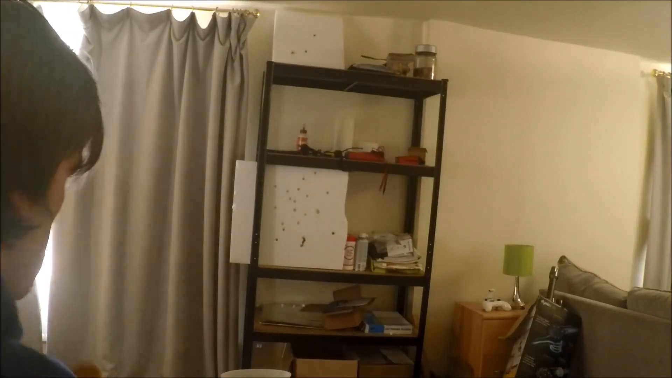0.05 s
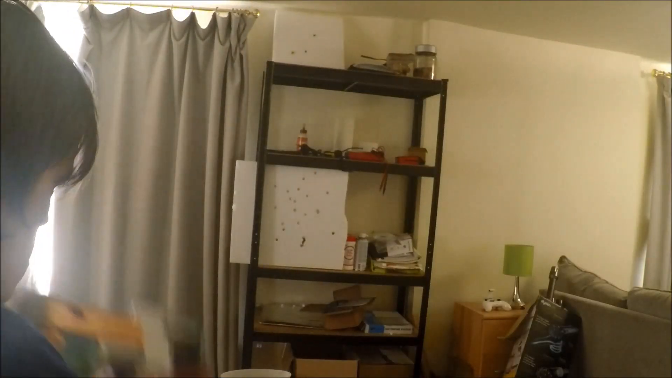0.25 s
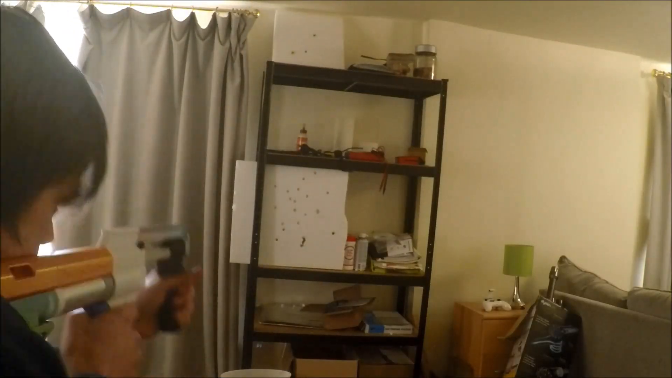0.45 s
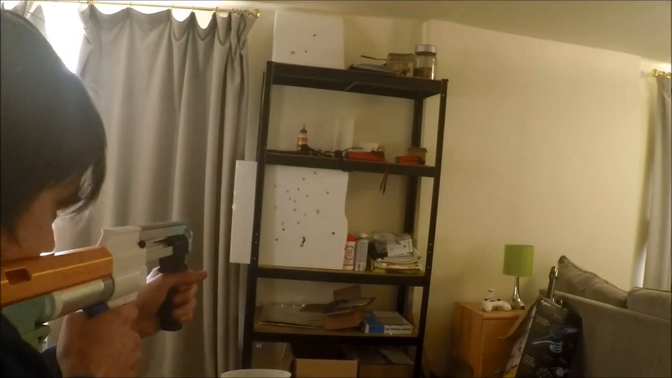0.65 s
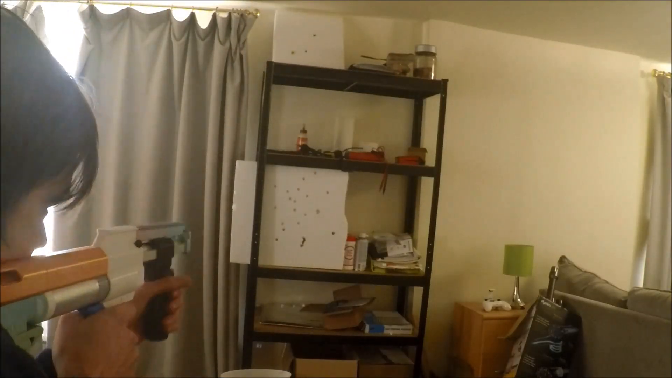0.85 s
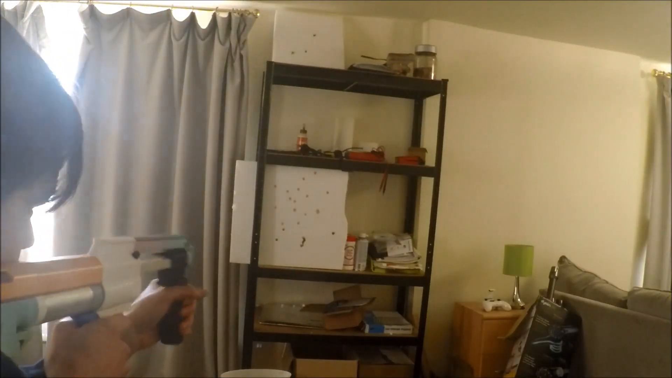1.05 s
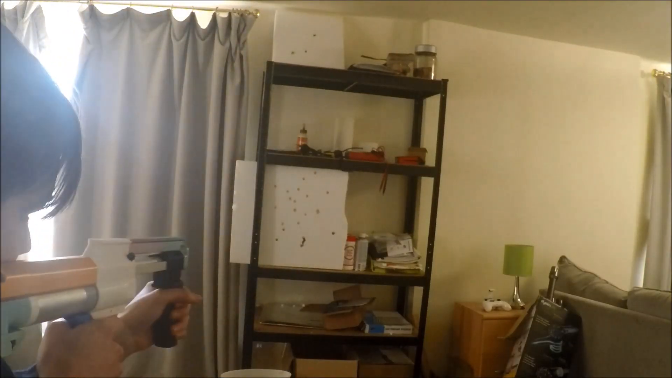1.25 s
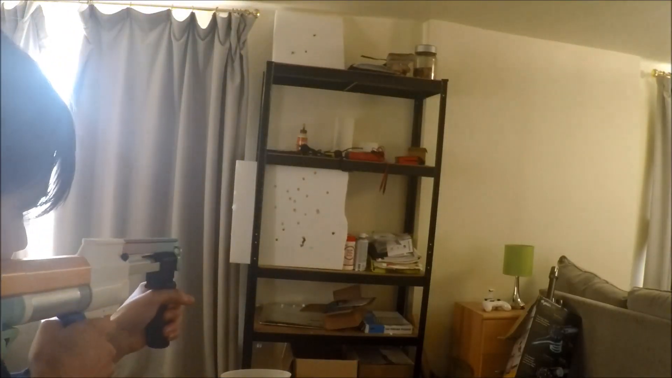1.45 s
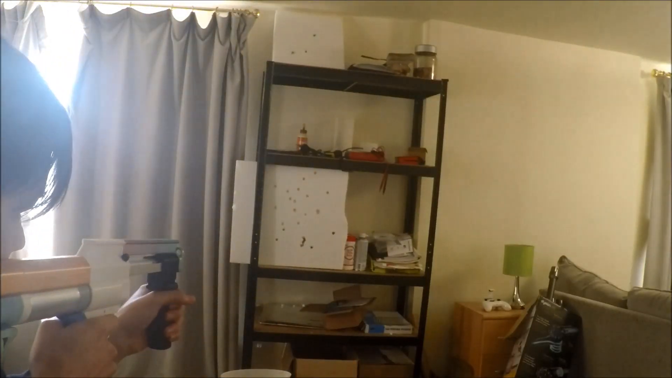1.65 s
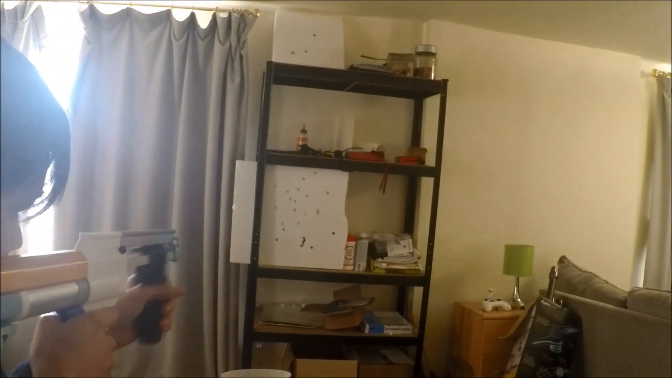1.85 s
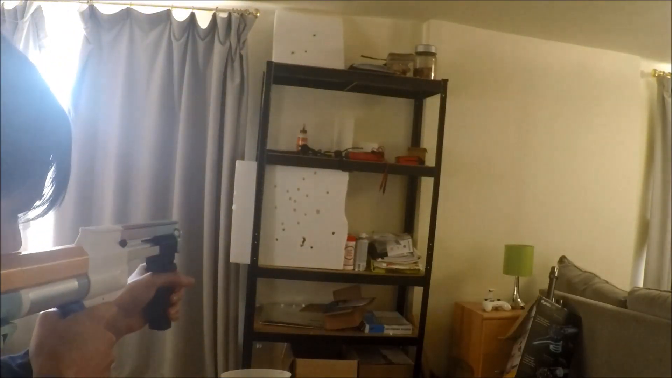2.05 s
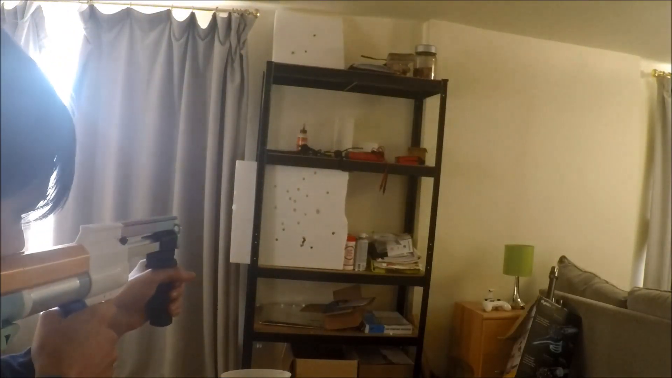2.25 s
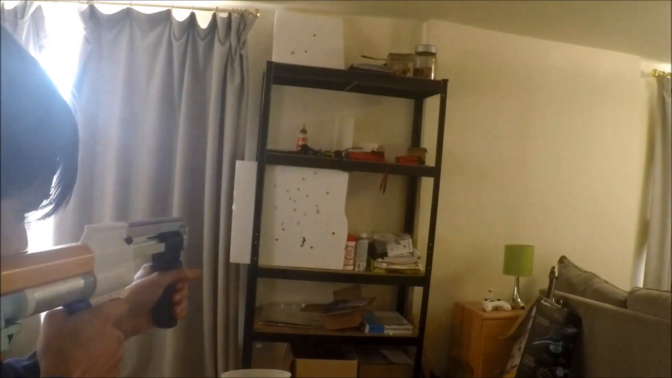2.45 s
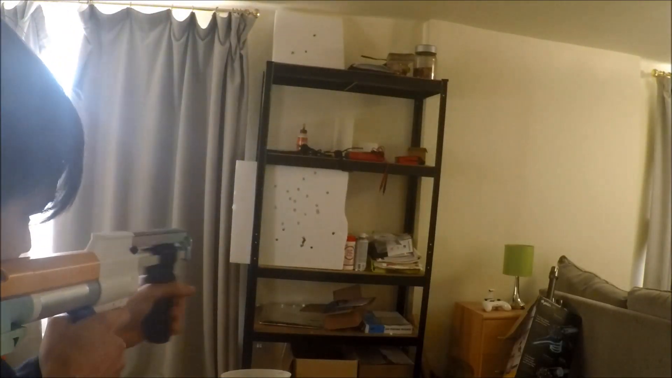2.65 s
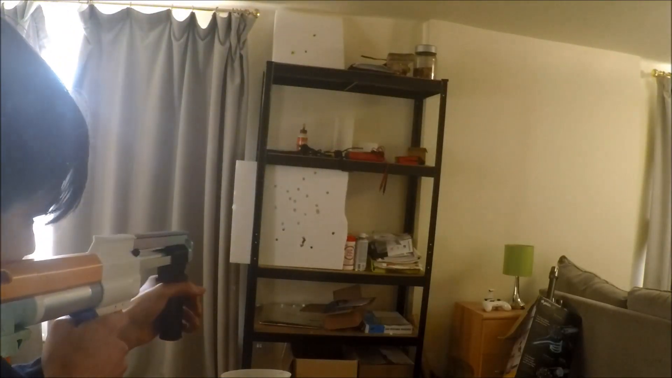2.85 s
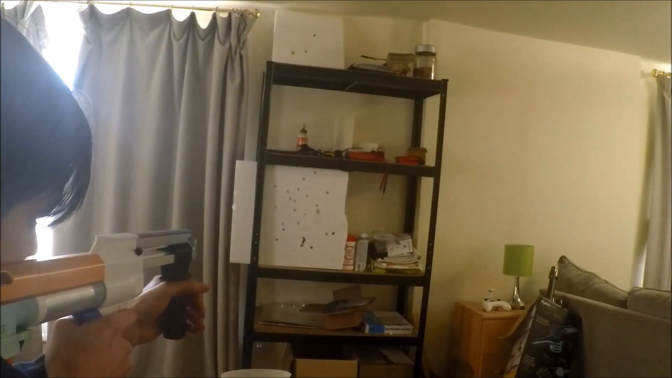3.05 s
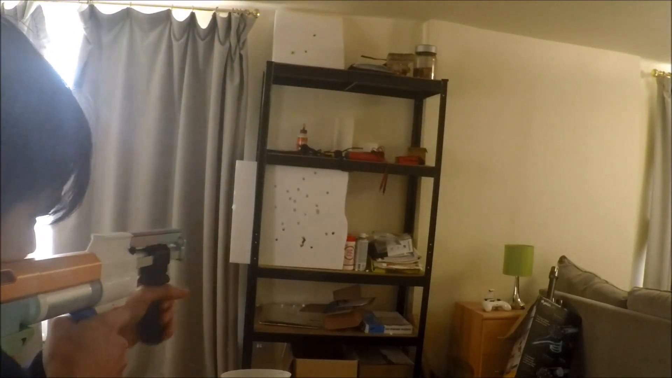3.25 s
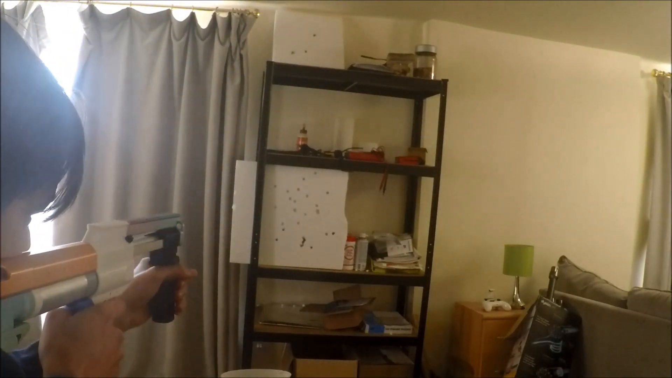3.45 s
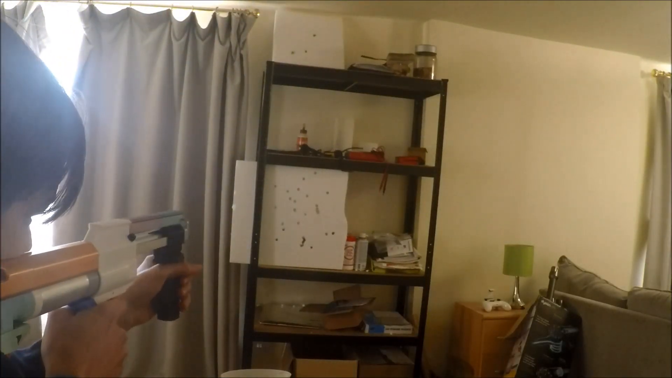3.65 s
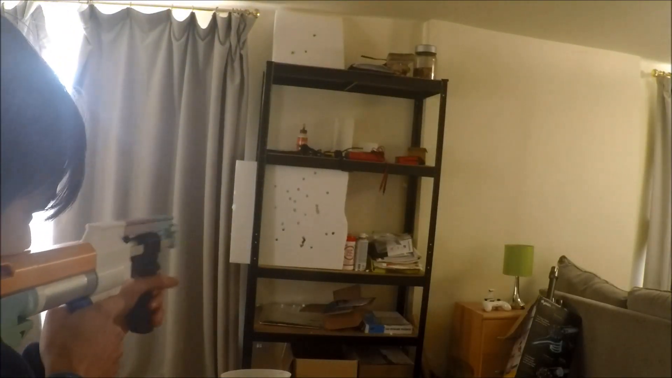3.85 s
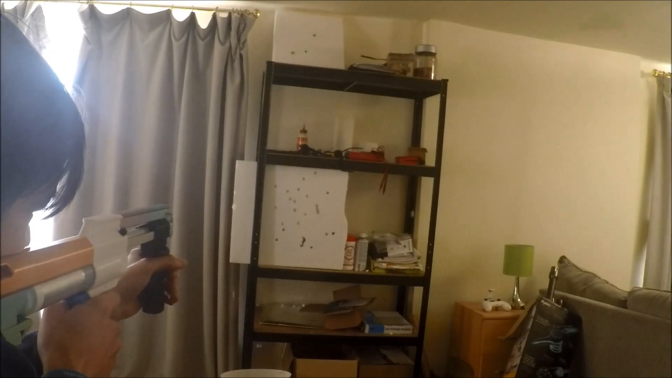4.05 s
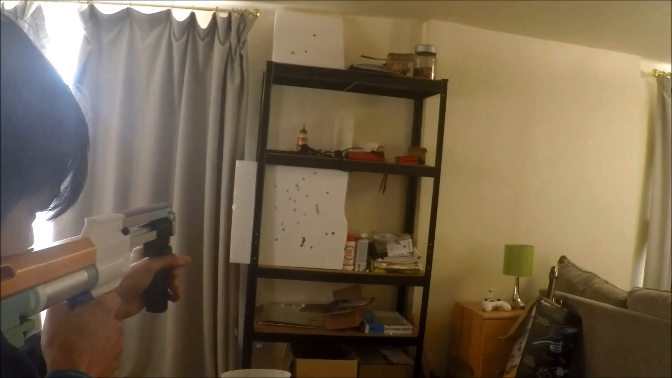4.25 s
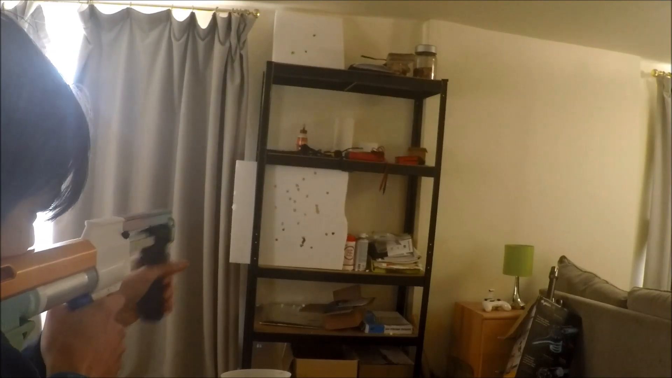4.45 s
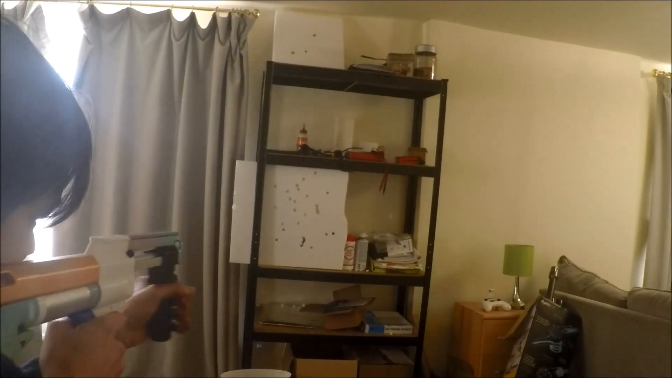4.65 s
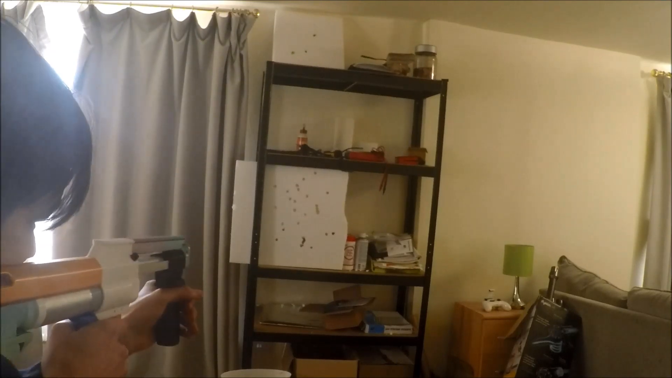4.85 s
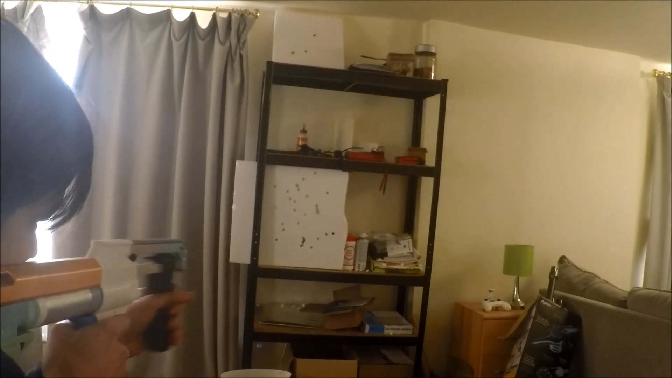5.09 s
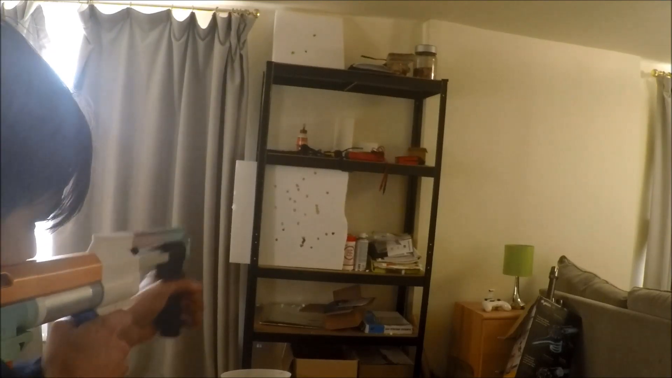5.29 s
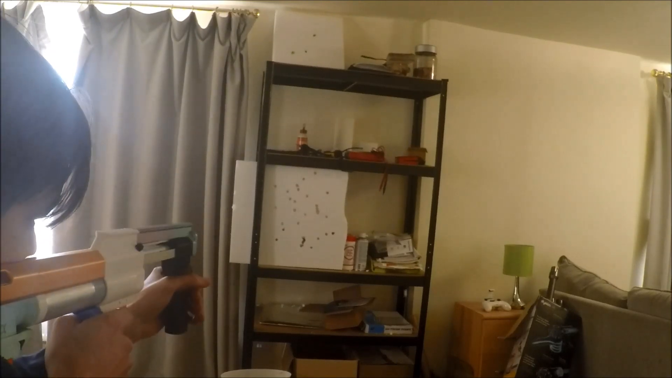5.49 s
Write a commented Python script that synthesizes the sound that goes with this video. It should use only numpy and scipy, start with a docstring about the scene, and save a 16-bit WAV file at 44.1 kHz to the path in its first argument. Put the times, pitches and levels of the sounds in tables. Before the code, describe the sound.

A plastic pump-action toy blaster works close to the microphone in a furnished living room, over faint hiss and low rumble. At about 0.9 seconds its grip slides back with a brief rasp and a click, then clacks forward at 1.1. The first shot comes at 1.5 seconds: a loud, rattling plastic snap with a low thump and a faint ring from the spring. More shots follow at about 2.3, 3.0, 3.6, 4.2, 4.9 and 5.5 seconds, each preceded by the same quieter back-and-forward pair of clacks and small ticks. A split second after each of the first six shots, a foam dart slaps a board across the room, with a brief ring and low boom. Soft bumps of falling darts and handling come in between. The room's reverberation is short, and the sound ends right after the seventh shot.

```python
"""A pump-action toy blaster is primed and fired seven times in a furnished living room.
In each shot a spring drives a plunger rattling down the plastic shell, and the recoil excites the modes
of shell and coil. Some 50 ms later the foam dart slaps a board, which rings over a low boom.
Before each shot the grip slides back to a catch, then forward to a stop, with friction and impacts.
Spent darts drop softly, and the room adds a short reverberation over faint hiss and rumble."""
import sys
import numpy as np
from scipy import signal
from scipy.fft import rfft, irfft
from scipy.io import wavfile
from scipy.ndimage import uniform_filter1d, minimum_filter1d

SR = 44100
rng = np.random.default_rng(int(sys.argv[2]) if len(sys.argv) > 2 else 0)


def transcribe(signal):
    """Save signal, clipped to [-1, 1], as a 16-bit WAV file at the path in sys.argv[1]."""
    frames = np.atleast_2d(signal).T
    limited = np.clip(frames, -1, 1)
    pcm = np.round(limited * 32767).astype(np.int16)
    wavfile.write(sys.argv[1], SR, pcm)


N = 243476
TIME = np.arange(N) / SR
PULL_S = 0.067   # duration of every backward stroke

# Trigger releases: t/s, rattle level/dB, thump level/dB (all table levels are relative)
SHOTS = [(1.4712, 2.5, 2), (2.3011, 0.5, 3), (2.9697, 0.5, 0), (3.6185, 1, -0.5), (4.2481, 1, 1),
         (4.9295, 0.5, 1.5), (5.498, 0.5, -1)]
# The grip reaches the rear catch: t/s, crack level/dB, latch level/dB, pull friction level/dB
CATCHES = [(0.8908, -15.5, -23, -41), (1.8121, -20, -24, -42), (2.596, -27, -28.5, -45),
           (3.245, -27.5, -28, -45.5), (3.8652, -22, -24.5, -42.5), (4.574, -23.5, -22.5, -43),
           (5.1968, -26.5, -27.5, -46)]
# The grip reaches the front stop: t/s, clack level/dB, push friction level/dB
STOPS = [(1.0883, -17.5, -42), (1.959, -17, -41.5), (2.7688, -22.5, -46), (3.379, -16, -41),
         (4.0284, -23, -42.5), (4.7135, -16, -41), (5.3412, -22.5, -42)]
# Spectrum of plastic rubbing on plastic: f/Hz, level/dB
FRICTION = [(150, -17.5), (500, -6.5), (1000, -0.5), (2200, 1), (3000, -2), (4200, -2.5), (6500, -9.5),
            (10000, -18.5), (16000, -30)]
# Spectrum of a dull impact: f/Hz, level/dB
BUMP = [(60, -20), (180, 0.5), (380, -3.5), (600, -7.5), (1200, -27), (5000, -79)]


def from_db(db):
    """Amplitude ratio of a level in decibels."""
    return 10 ** (np.asarray(db) / 20)


def at_hz(points, hz):
    """Interpolation on a logarithmic frequency axis."""
    knots, values = np.transpose(points)
    return np.interp(np.log(np.maximum(hz, 1)), np.log(knots), values)


def unit_energy(x):
    """A response of unit energy passes white noise at unchanged power."""
    return x / np.sqrt(np.sum(x ** 2) + 1e-20)


def through(x, response):
    """Convolution with an impulse response, cut to the scene's length."""
    return signal.fftconvolve(x, response)[:N]


def colour(x, spectrum, size=8192):
    """Minimum-phase filter of unit power gain: folding the cepstrum makes it causal."""
    hz = np.arange(size // 2 + 1) * SR / size
    cepstrum = irfft(np.log(from_db(at_hz(spectrum, hz))))
    cepstrum[1:size // 2] *= 2
    cepstrum[size // 2 + 1:] = 0
    return through(x, unit_energy(irfft(np.exp(rfft(cepstrum)))))


def clicks(times, db):
    """Impulsive excitation: one impulse per event."""
    out = np.zeros(N)
    out[np.clip(np.round(np.asarray(times) * SR).astype(int), 0, N - 1)] = from_db(db)
    return out


def fade(t, t60):
    """Exponential decay, by 60 dB in t60 seconds."""
    return np.exp(-np.log(1000) * t / t60)


def ring(force, hz, t60):
    """Damped oscillator: a unit impulse starts a decaying sine of height 1."""
    r, w = fade(1 / SR, t60), 2 * np.pi * hz / SR
    return signal.lfilter([0, np.sin(w)], [1, -2 * r * np.cos(w), r * r], force + 1e-18)


def grit(spread_db, grain_s):
    """Random amplitude modulation: noise of rms 1 whose level varies from grain to grain."""
    knots = np.arange(0, N / SR, grain_s)
    white = rng.standard_normal(N)
    strength = np.clip(rng.standard_normal(N)[:len(knots)], -2, 2)
    x = white * from_db(spread_db * np.interp(TIME, knots, strength))
    return x / np.std(x)


def knocks(rows, spectrum, gain_db, t60, chatter_s, attack_s):
    """Impact noise: at each row (t/s, level/dB) loose parts chatter briefly, then damping takes over."""
    times, db, *_ = np.transpose(rows)
    t = TIME[:SR // 2]
    envelope = np.minimum(t / attack_s, 1) * fade(np.maximum(t - chatter_s, 0), t60)
    return colour(grit(2.56, 0.00091) * through(clicks(times, db + gain_db), envelope), spectrum)


def background(hiss_db=-56, rumble_db=-61.5):
    """Ambient noise floor: a steady faint hiss and an uneven low rumble."""
    # Spectra of hiss and rumble: f/Hz, level/dB
    hiss_spectrum = [(20, 4), (56, 2), (123, -18), (200, -15.5), (400, -25.5), (1000, -29.5), (3500, -33.5),
                     (8000, -40), (14000, -46), (16000, -57)]
    rumble_spectrum = [(15, -10.5), (45, 1.5), (110, -17.5), (220, -24), (600, -51), (3000, -87)]
    rumble = colour(grit(4, 0.025), rumble_spectrum)
    hiss = colour(rng.standard_normal(N), hiss_spectrum)
    return from_db(hiss_db) * hiss + from_db(rumble_db) * rumble


def soft_bumps():
    """Soft contacts last long, so their energy lies at low frequencies."""
    # Falling darts and handling: t/s, level/dB
    bumps = [(.383, -60.5), (.826, -53.5), (.893, -53), (2.483, -42), (2.812, -48.5), (3.21, -41),
             (4.53, -46), (4.66, -44), (5.253, -39.5)]
    return knocks(bumps, BUMP, gain_db=-0.5, t60=0.15, chatter_s=0.025, attack_s=0.0088)


def small_contacts():
    """Backlash: parts tick as the grip unlocks, rides a ridge and feeds a dart, or the trigger moves."""
    # The grip knocks in its play: t/s, level/dB
    ticks = [(.776, -57), (.989, -33), (1.714, -51), (3.179, -39.5), (3.934, -36.5), (4.479, -44.5),
             (4.634, -34.5)]
    unlock = [(t - PULL_S, pull_db - 4.5) for t, *_, pull_db in CATCHES]
    ridge = [(t - 0.032, pull_db) for t, *_, pull_db in CATCHES]
    feed = [(t - 0.052, push_db + 3.5) for t, _, push_db in STOPS]
    trigger = [(t - 0.041, -63.5) for t, *_ in SHOTS]
    contacts = ticks + unlock + ridge + feed + trigger
    return knocks(contacts, FRICTION, gain_db=-2, t60=0.028, chatter_s=0.004, attack_s=0.0015)


def travel(start, end, end_db, rise_db):
    """Friction grows with load and speed: the envelope of one stroke, rising linearly in level."""
    progress = (TIME - start) / (end - start)
    return from_db(end_db - rise_db * (1 - np.clip(progress, 0, 1))) * (progress >= 0) * (progress < 1)


def slide(gain_db=-0.5, slip_db=4.5, slips_per_s=45):
    """Stick-slip friction: the grip rasps and ticks as it is pulled back, slackens and is pushed home."""
    envelope = 0
    for (rear, _, _, pull_db), (front, _, push_db) in zip(CATCHES, STOPS):
        pull = travel(rear - PULL_S, rear, pull_db, rise_db=8)   # the spring is squeezed
        slacken = from_db(pull_db + 2.5) * fade(np.abs(TIME - rear), t60=0.25) * (TIME >= rear)
        push = travel(rear, front, push_db, rise_db=14.5)   # the grip gathers speed
        envelope = envelope + pull + np.hypot(slacken, push)
    slips = signal.lfilter([1], [1, -fade(1 / SR, t60=0.018)], rng.random(N) < slips_per_s / SR)
    rasp = envelope * (1 + from_db(slip_db) * slips) * grit(2, 0.002)
    return from_db(gain_db) * colour(rasp, FRICTION)


def end_clacks():
    """Hard contacts are brief, hence broadband: the grip strikes the rear catch, then the front stop."""
    # Spectra of the two impacts: f/Hz, level/dB
    catch_spectrum = [(150, -21), (450, -14), (1000, -5.5), (1400, -7.5), (1900, 5), (2450, -1.5),
                      (2900, -3.5), (4500, -3.5), (6000, -11), (9000, -18), (16000, -32)]
    stop_spectrum = [(150, -15), (550, -13.5), (950, 0), (1300, -5.5), (1750, 2), (2500, -5), (4100, -1),
                     (6000, -8.5), (9000, -14), (16000, -35)]
    rear = knocks(CATCHES, catch_spectrum, gain_db=-6, t60=0.011, chatter_s=0.0077, attack_s=0.000465)
    front = knocks(STOPS, stop_spectrum, gain_db=-9.5, t60=0.049, chatter_s=0.0063, attack_s=0.0026)
    return rear + front


def latch(gain_db=-1.5, chatter_s=0.0055):
    """Free vibration of a stiff tongue: the catch drops into its notch, chatters and rings briefly."""
    # Modes of the tongue: f/Hz, level/dB, T60/s
    modes = [(1900, -36, 0.027), (2275, 2.5, 0.0212), (2476, -1, 0.054), (2600, -0.5, 0.024)]
    times, _, ring_db, _ = np.transpose(CATCHES)
    drops = clicks(times, ring_db + gain_db)
    chatter = np.interp(TIME[:SR // 20], [0, chatter_s, 2 * chatter_s], [1, 1, 0])
    rebounds = through(drops, unit_energy(chatter))
    return sum(from_db(db) * ring(drops + rebounds * rng.standard_normal(N), hz, t60)
               for hz, db, t60 in modes)


def shell_thuds():
    """Structure-borne sound: either end of the grip's travel thuds through the shell."""
    ends = [row[:2] for row in CATCHES + STOPS]
    return knocks(ends, BUMP, gain_db=-30.5, t60=0.1, chatter_s=0.0039, attack_s=0.0023)


def spring(shot_db=-46, catch_db=-55, stop_db=-64, t60=0.55):
    """High modal density: jarred by catch, stop and release, the coil's wire rings on as noise."""
    # Envelope of the close wire modes: f/Hz, level/dB
    wire_spectrum = [(700, -11.5), (1400, -4.5), (1850, 2), (2400, -9), (3200, -1), (4000, 9), (4700, -10),
                     (6000, -19.5), (12000, -42)]
    causes = [(SHOTS, shot_db), (CATCHES, catch_db), (STOPS, stop_db)]
    times, levels = np.transpose([(row[0], db) for rows, db in causes for row in rows])
    envelope = through(clicks(times, levels), fade(TIME[:SR], t60))
    return colour(grit(0.86, 0.0041) * envelope, wire_spectrum)


def plunger(rattle_db=-18, slam_db=3.5, alike=0.402, creep_s=0.0059, settle_t60=0.054):
    """Friction and repeated impact: the plunger scrapes down its tube, slams home and rebounds."""
    # The slam and its rebounds: t/s after release, level/dB
    impacts = [(0.0086, 5), (0.012, -11), (0.0192, 0.5)]
    # Spectrum of the rattling shell: f/Hz, level/dB
    rattle_spectrum = [(70, -6.5), (150, 10), (350, 2), (600, 1), (1000, 1), (1600, -0.5), (2800, 1),
                       (4800, -2.5), (6500, -5), (8000, -11.5), (10000, -10), (13000, -21), (16000, -30.5)]
    times, level, _ = np.transpose(SHOTS)
    lead_s = 0.01   # the force begins ahead of the release
    t = TIME[:SR // 14] - lead_s
    first, last = impacts[0][0], impacts[-1][0]
    # The sear creeps; the plunger scrapes until its first slam, rattles until its last, then settles.
    creep, scrape = from_db(-30.5), from_db(-8)
    settle = fade(np.maximum(t - last, 0), settle_t60)
    force = np.select([t < -creep_s, t < 0, t < first], [0, creep, scrape], settle)
    releases = clicks(times - lead_s, level)
    # A share of the power, alike, has the same waveform in every shot.
    same = through(releases, force * grit(0.89, 0.0005)[:len(force)])
    fresh = through(releases, force) * grit(2.8, 0.0002)
    rattle = from_db(rattle_db) * (np.sqrt(alike) * same + np.sqrt(1 - alike) * fresh)
    slams = sum(clicks(times + delay, level + db + slam_db) for delay, db in impacts)
    return colour(rattle + slams, rattle_spectrum)


def recoil(gain_db=-1):
    """Action and reaction: each release drives spring and shell in opposite senses, making a thump."""
    # Surge waves along the coil, and low modes of the shell: f/Hz, level/dB, T60/s
    surge_modes = [(63.7, -22, 0.39), (123, -31.5, 0.31), (187.2, -25.5, 0.2)]
    shell_modes = [(253.6, -28.5, 0.061), (294, -25.5, 0.244)]
    times, _, thump_db = np.transpose(SHOTS)
    kick = clicks(times, thump_db + gain_db)
    surge = sum(from_db(db) * ring(kick, hz, t60) for hz, db, t60 in surge_modes)
    shell = sum(from_db(db) * ring(kick, hz, t60) for hz, db, t60 in shell_modes)
    return surge - shell


def darts(slap_db=-10.5, crack_db=5.5, modes_db=-0.5, boom_below_hz=330):
    """Impact excitation: where a dart lands on the board decides how strongly each resonance rings."""
    # Hits: t/s, slap level/dB, ring level/dB, boom level/dB
    hits = [(1.5307, -4, 1.5, 0.5), (2.3501, 1.5, -1, 5.5), (3.0216, -2.5, 2.5, 0), (3.6718, 0, -4.5, -5.5),
            (4.296, -1, 2, -0.5), (4.981, 0, -1.5, 1)]
    # Resonances of the dart's hit, a low boom and the board's ring: f/Hz, level/dB, T60/s
    modes = [(132, -26, 0.14), (182, -20.5, 0.089), (228.7, -21.5, 0.19), (454.7, -24, 0.2),
             (563, -21, 0.09), (619, -15, 0.023), (1037, -15, 0.067), (1096, -21, 0.082),
             (1313, -18.5, 0.0395), (1376, -23, 0.094)]
    # Spectrum of foam striking the board: f/Hz, level/dB
    slap_spectrum = [(60, -13.5), (95, -20), (140, 2.5), (240, 4), (350, -8), (600, 3.5), (1100, -1),
                     (1500, 0.5), (2200, -5), (3800, -9.5), (6000, -14), (10000, -22), (16000, -35.5)]
    times, slap_level, ring_level, boom_level = np.transpose(hits)
    envelope = through(clicks(times, slap_level + slap_db), fade(TIME[:SR // 2], t60=0.076))
    slap = grit(0.79, 0.00054) * envelope   # countless short-lived modes merge into noise
    crack = clicks(times, slap_level + crack_db)
    resonances = 0
    for hz, db, t60 in modes:
        level = (boom_level if hz < boom_below_hz else ring_level) + rng.normal(0, 1, len(times))
        resonances += ring(clicks(times, level + db + modes_db), hz, t60)
    return colour(slap - crack, slap_spectrum) - resonances


def with_reflections(x, db, span_s, count=24):
    """Early reflections: shelves, ceiling and wall add a tight cluster of echoes to the direct sound."""
    delays = span_s * (np.arange(count) + 1 + rng.random(count)) / count
    echoes = clicks(delays, 0) * rng.choice([-1, 1], N)
    return x + from_db(db) * through(x, unit_energy(echoes[:SR // 8]))


def reverberation(x, build_s=0.0011, delay_s=0.011):
    """Diffuse field: each half-octave band stores the energy it receives and returns it as dying noise."""
    # Reverberation time of the room: f/Hz, T60/s
    room_t60 = [(100, 0.38), (400, 0.33), (1200, 0.27), (4000, 0.29), (8000, 0.19), (15000, 0.25)]
    edges = 100 * 2 ** (np.arange(16) / 2)
    white, out = rng.standard_normal((2, N)), np.zeros(N)
    build = np.exp(-1 / (build_s * SR))
    for k, (low, high) in enumerate(zip(edges, edges[1:])):
        band = signal.butter(2, [low, high], "band", fs=SR, output="sos")
        keep = fade(1 / SR, at_hz(room_t60, np.sqrt(low * high))) ** 2   # energy left after one sample
        received = signal.sosfilt(band, x + 1e-12 * white[0]) ** 2
        stored = signal.lfilter([(1 - keep) * (1 - build)], [1, -keep - build, keep * build], received)
        noise = signal.sosfilt(band, white[k % 2])
        out += np.sqrt(np.maximum(stored, 0)) * noise / np.std(noise)
    return np.interp(TIME - delay_s, TIME, out)


def room_node(x, band_hz=(76, 112)):
    """A standing wave of the room has a node at the microphone, which notches out one bass band."""
    return signal.sosfilt(signal.butter(2, band_hz, "bandstop", fs=SR, output="sos"), x)


def scene():
    """Superposition of direct and reflected sound: the blaster is close by, the board across the room."""
    rattle = with_reflections(plunger(), db=-8, span_s=0.0096)
    thump = recoil()
    pump = with_reflections(end_clacks() + small_contacts(), db=-2.5, span_s=0.0095)
    pump = pump + slide() + latch() + shell_thuds()
    target = with_reflections(darts(), db=-7.5, span_s=0.03) + soft_bumps()
    reverb = reverberation(from_db(-14.5) * rattle + from_db(-6.5) * thump
                           + from_db(-11.5) * pump + from_db(-8.5) * target)
    sound = room_node(rattle + thump + pump + target + reverb + spring())
    return (sound + background())[None]


def record(dry, bass_hz=38, peak_limit=0.49, cutoff_hz=16500):
    """Band and peak limiting: the microphone sheds deep bass, a limiter holds peaks, the top is cut."""
    heard = signal.sosfilt(signal.butter(2, bass_hz, "high", fs=SR, output="sos"), dry)
    allowed = peak_limit / np.maximum(np.abs(heard), peak_limit)
    gain = uniform_filter1d(minimum_filter1d(allowed, size=33), size=33)
    return signal.sosfilt(signal.cheby2(16, 70, cutoff_hz, fs=SR, output="sos"), gain * heard)


dry = scene()
out = record(dry)
transcribe(out)
```